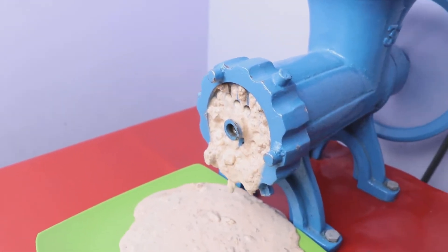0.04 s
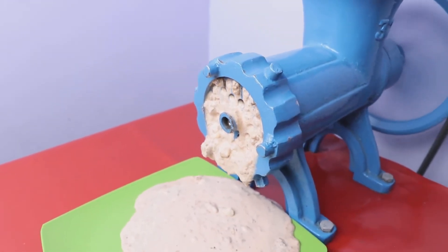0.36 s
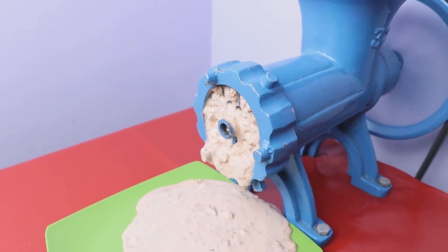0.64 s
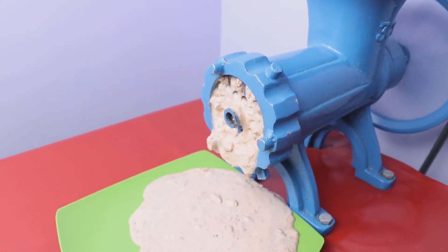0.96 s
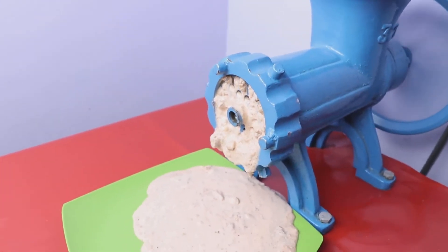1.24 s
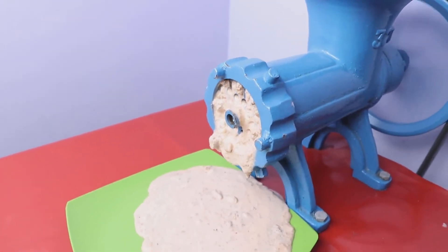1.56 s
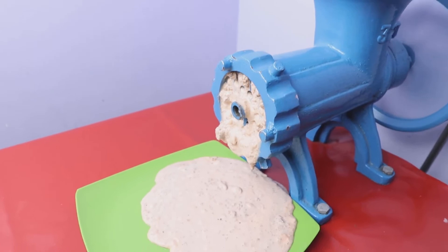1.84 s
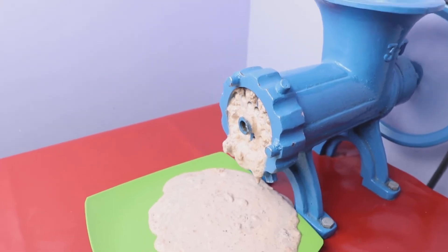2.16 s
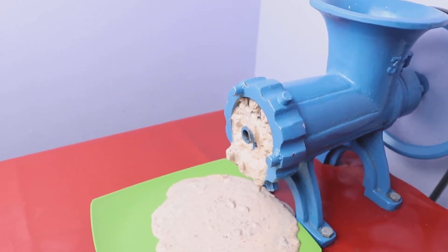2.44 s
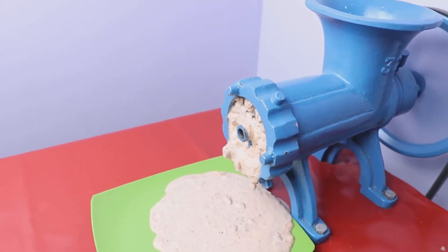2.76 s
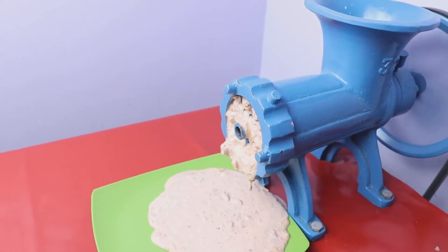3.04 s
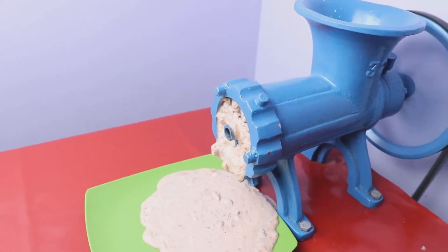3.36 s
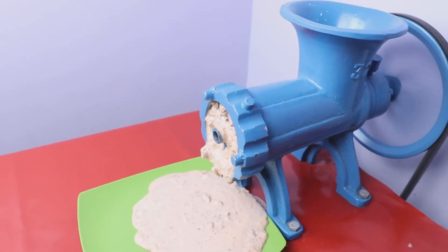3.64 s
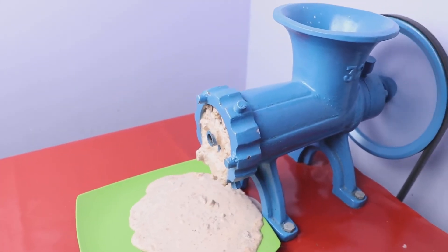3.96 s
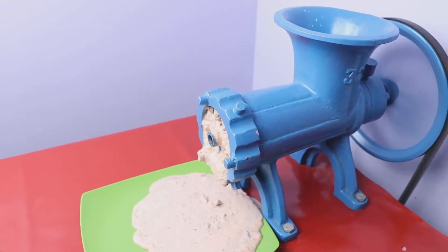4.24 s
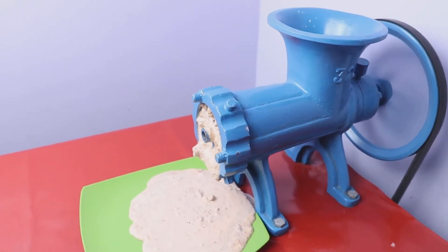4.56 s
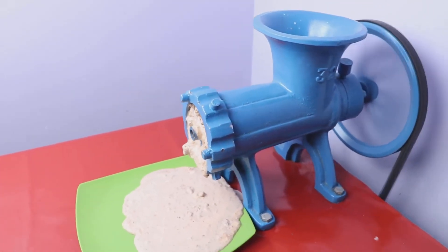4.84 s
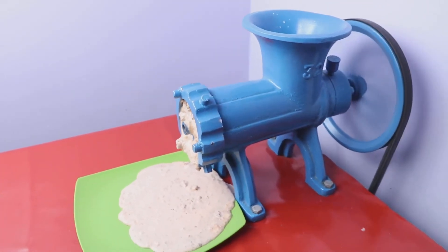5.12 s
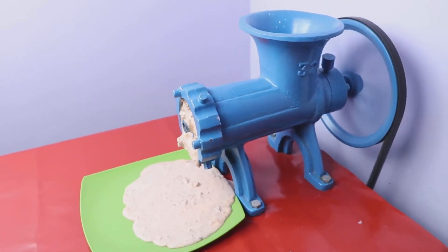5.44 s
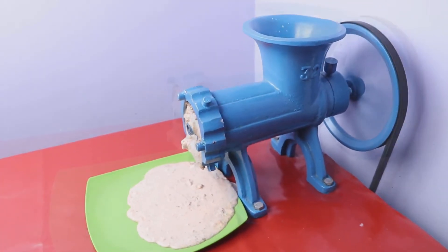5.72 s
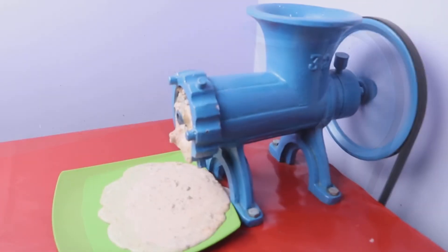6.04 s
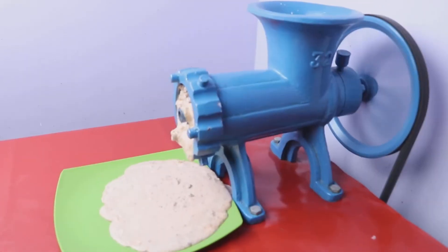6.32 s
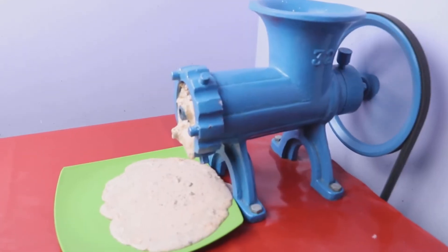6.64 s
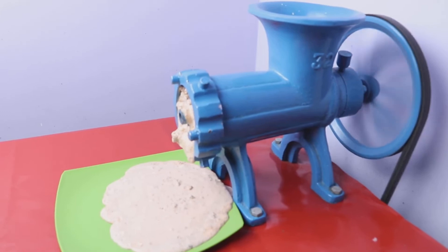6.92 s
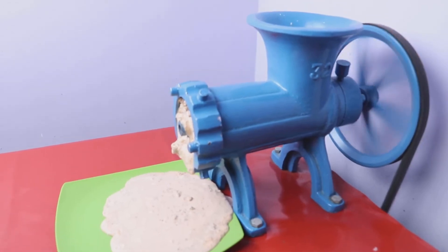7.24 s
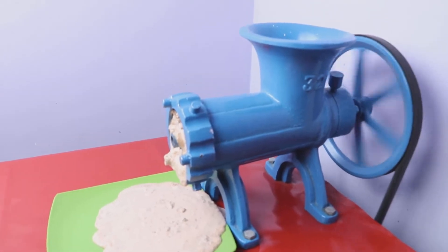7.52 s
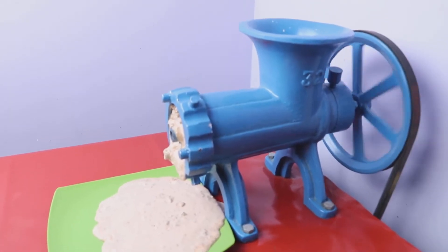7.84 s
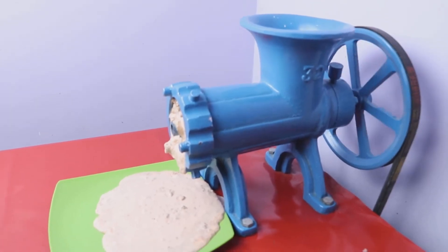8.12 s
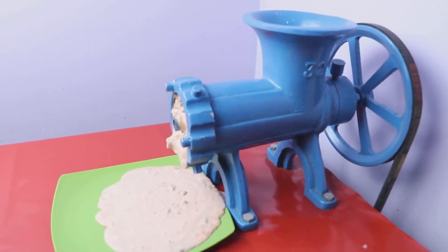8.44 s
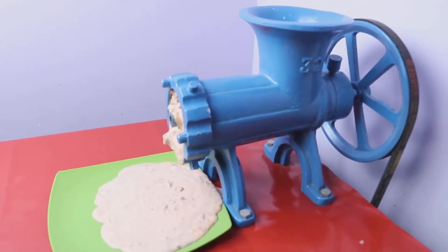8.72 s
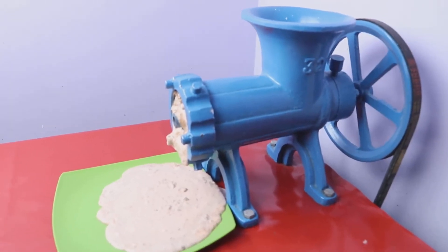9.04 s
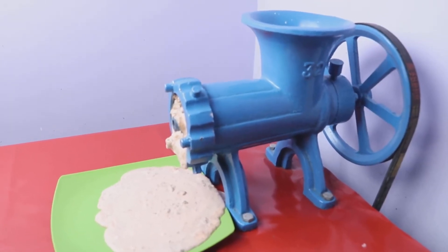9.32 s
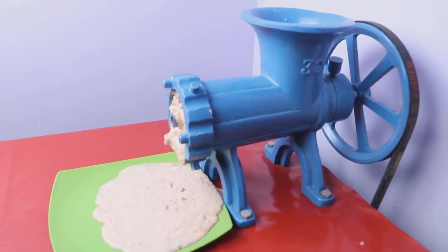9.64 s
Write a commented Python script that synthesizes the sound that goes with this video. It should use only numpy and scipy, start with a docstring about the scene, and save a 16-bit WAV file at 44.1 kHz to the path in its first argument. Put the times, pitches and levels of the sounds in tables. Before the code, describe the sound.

An iron grinder rattles and grinds squelching dough over a motor hum, then winds down with a few clanks into quiet.

```python
"""Cast-iron meat grinder pushing dough

A belt-driven grinder runs on a table: the motor hums, the boards rumble, the auger churns and rattles.
Each turn catches and grinds, every contact sounds through the iron body, the dough squelches and snaps.
The sound drops out for an instant and returns louder and hollower. The motor is switched off,
the wheel coasts to rest with separate clanks and ticks, and a small quiet room remains."""
import sys
import numpy as np
from scipy import signal
from scipy.fft import rfft, irfft, next_fast_len
from scipy.io import wavfile
from scipy.ndimage import uniform_filter1d, map_coordinates

SR = 44100
rng = np.random.default_rng(int(sys.argv[2]) if len(sys.argv) > 2 else 0)


def wav_record(signal):
    """Record a signal, one row per channel, as 16-bit PCM in the file named by sys.argv[1]."""
    frames = np.transpose(np.atleast_2d(signal))
    bounded = np.clip(frames, -1, 1)
    # unit amplitude maps onto the largest positive 16-bit level
    quanta = np.round(bounded * 32767).astype(np.int16)
    wavfile.write(sys.argv[1], SR, quanta)


N = 431298
TIME_S = np.arange(N) / SR
DROP_START, DROP_END, SWITCH_OFF, WHEEL_STOP = 5.889, 5.923, 6.785, 7.85  # t/s
MAINS_HZ, WHEEL_HZ, EDGES_PER_TURN = 50, 8.74, 5
CRUNCH_LENGTH_S, CRUNCH_SWELL_S = 0.009, 0.008

# room reverberation: f/Hz, t60/s
ROOM_DECAY = [(200, 0.56), (420, 0.42), (800, 0.32), (2000, 0.29), (3600, 0.25), (6000, 0.14),
              (14000, 0.38)]
# background spectrum: f/Hz, density/dB
AIR_COLOUR = [(15, -39), (25, -35.5), (64, -2.5), (107, -6.5), (126, -18), (199, -4), (254, -10.5),
              (448, -13.5), (527, -17.5), (603, -17), (856, -20), (1320, -23), (5070, -36), (12700, -34),
              (15800, -49)]
# stereo width of background and machine: f/Hz, side minus mid/dB
AIR_WIDTH = [(60, -10.5), (110, -6), (200, -14), (380, -4), (700, -3), (1290, -1), (2380, 1), (4400, -1),
             (8120, 2), (15000, -4)]
MACHINE_WIDTH = [(100, -19), (250, -22), (400, -14), (700, -6.5), (1400, -2.5), (2200, 0.5), (4000, 0),
                 (14000, 0)]
# machine balance: f/Hz, left minus right/dB
BALANCE = [(60, 3.5), (200, -1.5), (400, -0.5), (800, -1.5), (1300, -1.5), (2300, -5.5), (4400, -3),
           (8000, -4.5), (15000, -2)]

# table resonances: f/Hz, width/Hz, level/dB
TABLE_MODES = [(79.5, 21, -4), (97.6, 8.6, 5.5), (153.1, 5.8, 3.5), (170.4, 3.9, 1.5), (243.6, 20, -9.5)]
# table jolts: t/s, lift/dB, half width/s
JOLTS = [(2.5, 17, 0.044), (6.19, 9, 0.078)]
# 100 Hz motor hum: t/s, level/dB
HUM_LEVEL = [(0.0, -41.5), (0.3, -43.5), (0.85, -44.5), (1.2, -46), (1.65, -41.5), (2.3, -47.5),
             (2.7, -41.5), (3.2, -45), (3.6, -43.5), (4.45, -46), (4.76, -37.5), (5.0, -48), (5.13, -39),
             (5.4, -45.5), (5.65, -44.5), (5.85, -47.5), (6.0, -39), (6.25, -31), (6.34, -42.5),
             (6.74, -31.5), (6.78, -34)]
# hum partials: multiple of the mains, level/dB
HUM_PARTIALS = [(2, 0), (3, -16), (4, -38), (8, -9.5), (12, -23)]
# dips of the hum, half as deep in the table: t/s, gain/dB, half width/s
HUM_DIPS = [(2.5, -10, 0.041), (4.54, -20, 0.037), (5.46, -20, 0.034), (6.4, -11, 0.019)]

# spectra of hiss and click: f/Hz, density/dB
HISS_COLOUR = [(3000, -58.5), (7000, -11), (11500, -11), (13000, -2.5), (14200, -9), (15800, -12)]
CLICK_COLOUR = [(500, -36), (3000, 2.5), (7000, 7), (10500, -7), (13500, -13), (15600, 1)]
# top-end shelf of a click: f/Hz, share of the sparkle
SPARKLE_SHELF = [(9000, 0), (15300, 1)]
# bright clicks, wet snaps in the dough and later ticks of iron clanks: t/s, level/dB, sparkle/dB
CLICKS = [(0.167, -50, -10), (0.274, -47, -14), (0.289, -45, 6.5), (0.343, -51, -10.5), (0.402, -44.5, 7),
          (0.458, -51.5, -11), (0.503, -54, -8.5), (0.771, -46, -13), (0.889, -51, -12),
          (0.916, -45.5, -14), (1.06, -54.5, 6), (1.091, -45, 5), (1.257, -53, -11.5), (1.417, -52, -3.5),
          (1.761, -52, -6.5), (1.869, -53, 4), (2.147, -47.5, -12.5), (2.188, -56, 5), (2.517, -51, -10.5),
          (2.817, -48.5, -10), (2.86, -48.5, -13), (2.919, -51, 5), (3.089, -46, -6.5), (3.362, -53, 2),
          (3.608, -46, -13), (3.822, -57, -10), (3.89, -49, -11), (3.951, -47.5, 7), (4.005, -47.5, -2.5),
          (4.163, -48, -2.5), (4.205, -50, -10), (4.347, -52, -10), (4.522, -46.5, 6.5),
          (4.738, -55.5, -10.5), (4.85, -53.5, -6), (5.039, -43.5, -15), (5.122, -43.5, -16),
          (5.236, -50, -12), (5.304, -54, 4), (5.35, -51, -8), (5.44, -52.5, -9), (6.476, -51, -9.5),
          (6.745, -51, -6), (6.872, -51, -11), (7.018, -50.5, -15), (7.127, -57.5, -18), (7.55, -56.5, -23),
          (7.681, -57, -21.5)]
# pings in the plate's holes: t/s, f/Hz, level/dB
PINGS = [(1.092, 7740, -48), (2.922, 7550, -43), (3.09, 3600, -43), (6.746, 4600, -39.5),
         (6.873, 4640, -44)]
# air squeezed from the dough: t/s, f/Hz, level/dB, length/s
SQUELCHES = [(0.287, 2200, -29.5, 0.016), (0.401, 2330, -31, 0.014), (0.77, 4800, -39.5, 0.0095),
             (0.8, 3900, -44, 0.015), (0.908, 5250, -50.5, 0.014), (1.09, 2730, -31.5, 0.011),
             (1.094, 4500, -52, 0.02), (1.097, 7400, -49, .012), (1.388, 3680, -47, 0.0096),
             (1.421, 6550, -50.5, 0.011), (1.801, 5000, -44, 0.024), (1.871, 2790, -34.5, 0.028),
             (2.147, 5260, -47, 0.025), (2.16, 8460, -53, 0.025), (2.819, 8260, -49.5, 0.025),
             (2.831, 4200, -47.5, 0.029), (2.917, 1440, -28.5, 0.012), (2.923, 7300, -41.5, 0.018),
             (3.089, 3020, -43, 0.022), (3.286, 4560, -45.5, 0.019), (3.606, 7200, -46.5, 0.011),
             (3.744, 4550, -52, 0.014), (3.94, 7150, -50, 0.042), (4.097, 4200, -51, 0.02),
             (4.165, 2120, -33, .018), (4.167, 6560, -46.5, 0.014), (4.2, 4270, -44.5, .018),
             (4.51, 2270, -30.5, 0.015), (4.522, 7100, -47.5, 0.01), (4.885, 4770, -46.5, .016),
             (4.962, 2330, -30.5, 0.022), (4.99, 2250, -32.5, 0.019), (5.005, 4630, -42.5, 0.029),
             (5.013, 7200, -50, 0.027), (5.112, 4500, -43, 0.03), (5.295, 2150, -35, 0.02),
             (5.415, 2050, -35.5, 0.015), (6.745, 4220, -43.5, 0.011), (6.871, 4110, -47, 0.015),
             (7.201, 6600, -53.5, 0.027)]

# iron body resonances: f/Hz, width/Hz, lift/dB
IRON_MODES = [(404.4, 56, 4.5), (520.5, 31, 4.5), (600, 20, 4.5), (754, 71, 5), (882, 38, 4), (1288, 15, 6),
              (1501, 39, 7), (1638, 92, 9), (1765, 86, 1.5), (1790, 110, 2.5), (1920, 31, 7), (2155, 13, 3),
              (2654, 53, 4.5), (2905, 69, -6.5), (3640, 79, 2), (4450, 310, 5), (5760, 440, 9.5),
              (6680, 470, 4), (7600, 81, 1.5)]
# lightly damped iron modes: f/Hz, level/dB, t60/s
RING_MODES = [(174.1, -9, 1.1), (409, -10, 1.05), (526, -16.5, .9), (720, -19, .7), (921, -10, 0.31),
              (1264, -15.5, .55), (1460, -19, .35)]
# body colour when packed with dough, hollow and coasting: f/Hz, density/dB
PACKED_COLOUR = [(130, -55), (220, -6.5), (332, -7), (395, 1.5), (466, -6), (728, -9), (1060, -13),
                 (1180, -3), (1810, -10.5), (1980, -5), (3150, -20.5), (5020, -35.5), (7570, -35),
                 (10300, -41.5), (15800, -63)]
HOLLOW_COLOUR = [(220, -30), (310, -15.5), (410, -0.5), (500, -8), (609, -8), (680, -13.5), (820, -2.5),
                 (1060, -19.5), (1200, -2.5), (1600, -7), (2050, -7.5), (2500, -18.5), (3000, -28.5),
                 (3650, -32), (5000, -45.5), (8000, -43.5), (15800, -66)]
COASTING_COLOUR = [(220, -32), (310, -16), (410, 0.5), (500, -9.5), (609, -7), (680, -12.5), (840, -5.5),
                   (960, -8), (1060, -13), (1200, -5.5), (1600, -10), (2050, -6), (2450, -11), (3000, -22),
                   (3650, -21.5), (5000, -37.5), (7000, -36.5), (9000, -43.5), (15800, -69.5)]
# the listening point wanders; bounds of the stretches with their own echo paths: t/s
STRETCH_BOUNDS_S = [0, 1.0, 2.0, 3.05, 4.0, 4.8, DROP_START, 6.7, 7.5, 8.2]
# contact bands, rows thud, clunk, clank, tick: low/Hz, high/Hz
BANDS_HZ = [(290, 680), (680, 1050), (1050, 3000), (3000, 20000)]
# machine effort: t/s, level/dB
EFFORT = [(0, 0.5), (5.88, -1), (5.93, 6.5), (6.02, 5.5), (6.5, 6.5), (6.62, 4.5), (6.87, 2.5), (7.1, -3.5),
          (7.36, -1.5), (7.5, -11), (7.8, -11)]
# slack feed, auger almost free: t/s, gain/dB, half width/s
LULLS = [(0.11, -7.5, 0.024), (0.16, -3, .012), (0.205, -0.5, 0.017), (0.55, -3.5, 0.013),
         (0.665, -5, 0.026), (0.99, -5, 0.022), (1.28, -3, 0.042), (1.51, -6, 0.034), (1.585, -3.5, 0.015),
         (1.712, -5, 0.022), (1.83, -5, 0.018), (2.282, -4, 0.026), (2.5, -2, .018), (2.76, -4.5, 0.025),
         (2.905, -1, .018), (3.03, -2.5, 0.046), (3.195, -1.5, 0.017), (3.53, -5, 0.013),
         (4.32, -2.5, 0.0181), (4.44, -3, 0.031), (4.705, -2.5, .02), (4.785, -3.5, 0.014),
         (5.22, -2.5, 0.028), (5.63, 0.5, 0.017), (6.085, -2, .018), (6.32, -1, .022), (6.56, -4.5, 0.016),
         (6.72, -3.5, 0.015), (7.115, -6, .015)]
# treble swing from uneven feed: t/s, level/dB
TREBLE_SWING = [(0.0, -45.5), (0.46, -47), (0.57, -45.5), (1.0, -51), (1.1, -49), (1.54, -51),
                (1.65, -49.5), (1.8, -51), (2.39, -48), (2.7, -39), (3.06, -53.5), (3.81, -49),
                (4.11, -47.5), (4.65, -47), (4.88, -45.5), (5.04, -46.5), (5.65, -42), (5.88, -43.5)]
# share of that swing: thud, clunk, clank, tick
TREBLE_SHARE = [0.05, .1, .4, .55]
# auger at zero drive, rows packed and hollow: thud/dB, clunk/dB, clank/dB, tick/dB
CHURN_DB = [(-42, -45, -45.5, -55.5), (-40, -47.5, -50.5, -61.5)]
CATCH_DB = [(-40.5, -40, -37.5, -53.5), (-35, -33, -42.5, -64.5)]
GRIND_DB = [(-41, -39.5, -37, -59), (-33.5, -31, -32, -65)]
# first grind past the tight spot, packed and hollow: t/s
FIRST_GRIND_S = [0.053, 6.035]
# stiff lumps crunching in the barrel: t/s, level/dB
LUMPS = [(0.287, -36), (0.41, -38), (0.713, -36), (0.742, -39.5), (0.82, -32), (0.878, -30.5), (1.062, -32),
         (1.094, -33), (1.43, -32.5), (1.644, -32), (1.761, -26), (1.884, -27.5), (2.19, -32.5),
         (2.462, -38.5), (2.673, -33), (3.364, -32), (3.605, -30), (3.832, -32), (3.9, -33.5), (3.958, -33),
         (4.165, -29.5), (4.29, -43.5), (4.531, -34.5), (4.665, -41), (4.855, -30.5), (4.985, -34),
         (5.301, -36), (5.425, -32.5), (5.447, -43.5), (5.768, -47), (6.039, -33.5), (6.158, -32),
         (6.272, -32), (6.497, -26)]
# iron on iron: t/s, level/dB, brightness/dB, extra thud/dB, chatter/s
STRIKES = [(0.132, -33.5, -4, -1, 0.0052), (0.168, -32.5, -2.5, -4, 0.0059), (0.23, -34.5, 4, 3, 0.009),
           (0.77, -37, 9.5, -4, 0.012), (0.915, -35, 8.5, -12, 0.0089), (1.03, -35, 0.5, 3, .012),
           (1.316, -31, 0, 0, .0074), (1.601, -40, -4, 6, .012), (1.737, -37, 0, 2, 0.0065),
           (1.847, -36.5, 4, 5, 0.0054), (2.309, -33, 1, 0, 0.0058), (2.42, -36.5, 3, 4, 0.027),
           (2.519, -37.5, 1, 14, 0.0066), (2.92, -33.5, -3, -3, 0.0065), (3.088, -32.5, 5.5, 1, 0.0081),
           (3.239, -38, 1.5, 4, 0.037), (4.003, -37, 3.5, 2, 0.026), (4.35, -31.5, 6, 0, 0.0084),
           (4.462, -33.5, 0, 6, .012), (5.099, -36, 5, 0, 0.02), (5.378, -34.5, 8, 0, .0065),
           (5.72, -35, 4.5, -2, 0.019), (6.022, -33, -18.5, 3, 0.0096), (6.107, -36.5, -7, -3, 0.01),
           (6.137, -31.5, -14.5, 5, .012), (6.22, -55, -22.5, 4, 0.013), (6.43, -32.5, -1, 0, .012),
           (6.475, -30.5, -3, -6, .008), (6.68, -38.5, -0.5, 7, 0.013), (6.745, -43, 17, 0, 0.0043),
           (6.795, -43, -13, 11, .0056), (6.838, -38.5, -9, 6.5, 0.0079), (6.872, -35, 5.5, -1, .009),
           (6.918, -34.5, -8.5, 4.5, .026), (6.966, -32.5, -3, 6, 0.0085), (7.02, -36.5, 2.5, 13, 0.0089),
           (7.085, -47, -14, 9.5, 0.013), (7.127, -32, -2, 2.5, .006), (7.189, -44.5, 6.5, 5.5, .015),
           (7.256, -45, -7.5, 3.5, .012), (7.29, -32.5, -7, -3, .0094), (7.329, -31, -4.5, 2.5, 0.0096),
           (7.404, -40.5, -2, 5, .014), (7.55, -35.5, -12, -4.5, 0.014), (7.611, -44.5, -14.5, -1, .025),
           (7.683, -26, -7, -4.5, .0105), (7.753, -35, -5, 0.5, 0.008), (7.761, -35, -20.5, -7.5, 0.0072),
           (7.793, -43, -24, -1, 0.0075), (7.815, -35.5, -18.5, -3.5, 0.0071)]
# lump or strike, one row a band: offset/dB, dB per dB of brightness
BLOW_COLOUR = [(-6.5, -0.97), (-10.5, -1), (0, 0), (-15.5, 1.2845)]


def amp(db):
    """Decibels to gain."""
    return 10 ** (np.asarray(db) / 20)


def unit(x):
    """Scale to rms 1."""
    return x / np.sqrt(np.mean(x ** 2) + 1e-20)


def along(points, hz):
    """Interpolate (f/Hz, value) points on a log axis."""
    knots_hz, values = np.transpose(points)
    return np.interp(np.log(hz + 1), np.log(knots_hz + 1), values)


def curve(points):
    """Interpolate (t/s, value) points per sample."""
    return np.interp(TIME_S, *np.transpose(points))


def bumps_db(rows):
    """Gaussian dips or swells from (t/s, gain/dB, half width/s) rows."""
    coarse_s = TIME_S[::64]
    gain_db = sum(db * np.exp(-((coarse_s - s) / width_s) ** 2) for s, db, width_s in rows)
    return np.interp(TIME_S, coarse_s, gain_db)


def wobble(rate_hz):
    """Smooth random curve."""
    coarse_s = TIME_S[::64]
    knots = rng.standard_normal(int(N * rate_hz / SR) + 4)
    return np.interp(TIME_S, coarse_s, map_coordinates(knots, [coarse_s * rate_hz]))


def filtered(x, response):
    """Apply a frequency response."""
    n = x.shape[-1]
    padded = next_fast_len(n + SR // 4)
    return irfft(rfft(x, padded) * response(np.fft.rfftfreq(padded, 1 / SR)), padded)[..., :n]


def causal(gain):
    """Minimum-phase response: rings only after a blow."""
    cepstrum = irfft(np.log(np.maximum(gain, 1e-6)))
    half = len(cepstrum) // 2
    cepstrum[1:half] *= 2
    cepstrum[half + 1:] = 0
    return np.exp(rfft(cepstrum))


def stereo_noise(colour, width):
    """Coloured noise, mid at rms 1."""
    mid = filtered(rng.standard_normal(N), colour)
    side = filtered(rng.standard_normal(N), lambda hz: colour(hz) * amp(along(width, hz)))
    return np.array([mid + side, mid - side]) / np.std(mid)


def room_paths(near_t60_s, direct_db, room_db, size=16384):
    """Mid and side spectra of direct wave, dense near echoes and room tail."""
    t, hz = np.arange(size) / SR, np.fft.rfftfreq(size, 1 / SR)
    near = unit(rng.standard_normal((2, size)) * amp(-60 * t / near_t60_s))
    near[0, 0] += amp(direct_db) * np.sqrt(size)
    bins_hz, frames_s, noise = signal.stft(rng.standard_normal((2, size)), SR, nperseg=256)
    decay = amp(-60 * frames_s / along(ROOM_DECAY, bins_hz)[:, None])
    tail = signal.istft(noise * decay, SR, nperseg=256)[1][:, :size]
    spectrum = rfft(np.array([unit(channel) for channel in near]) + amp(room_db) * unit(tail))
    spectrum[1] *= amp(along(MACHINE_WIDTH, hz))
    return hz, spectrum


def left_right(spectrum):
    """Mid and side spectra to a stereo impulse response, mid energy 1."""
    mid, side = irfft(spectrum)
    return np.array([mid + side, mid - side]) / np.linalg.norm(mid)


def run_out_db(fall_db_per_s):
    """Level fall after the wheel stops."""
    return -fall_db_per_s * np.maximum(TIME_S - WHEEL_STOP, 0)


def auger_drive_db(slack_db=-0.5, slack_s=0.018):
    """Auger pressure per band and sample: effort, lift-off before strikes, lulls, treble swing."""
    strikes_s = np.sort([row[0] for row in STRIKES] + [np.inf])
    wait_s = strikes_s[np.searchsorted(strikes_s, TIME_S)] - TIME_S
    lift_off_db = slack_db * np.exp(-(wait_s / slack_s) ** 2)
    treble_db, packed = curve(TREBLE_SWING), TIME_S < DROP_START
    swing_db = np.outer(TREBLE_SHARE, (treble_db - treble_db[packed].mean()) * packed)
    return curve(EFFORT) + lift_off_db + bumps_db(LULLS) + swing_db


def background(running_db=-56, still_db=-66):
    """Faint rumble and hiss, lower by switch-off; faded down briefly around 7.9 s."""
    level_db = np.interp(TIME_S, [DROP_START, SWITCH_OFF], [running_db, still_db])
    fade_db = -6.5 * np.exp(-((TIME_S - 7.89) / 0.34) ** 2)
    return amp(level_db + fade_db) * stereo_noise(lambda hz: amp(along(AIR_COLOUR, hz)), AIR_WIDTH)


def table_rumble(base_db=-50.5, effort_share=0.62, ease_db_per_s=1.0):
    """The machine shakes the table's low resonances."""
    def boards(hz):
        modes = sum((-1) ** k * amp(db) * 1j * hz * width_hz / (mode_hz**2 - hz**2 + 1j * hz * width_hz)
                    for k, (mode_hz, width_hz, db) in enumerate(TABLE_MODES))
        return modes / (1 + (hz / 330) ** 4) / (1 + (55 / (hz + 1)) ** 4)

    ease_db = ease_db_per_s * (DROP_START / 2 - TIME_S) * (TIME_S < DROP_START)
    level_db = base_db + effort_share * curve(EFFORT) + ease_db + run_out_db(fall_db_per_s=85)
    level_db += bumps_db(JOLTS) + .5 * bumps_db(HUM_DIPS)
    return amp(level_db) * stereo_noise(boards, MACHINE_WIDTH)


def motor(cut_db_per_s=2100):
    """Magnetic hum on mains multiples; dies at once at switch-off."""
    hum = np.zeros(N)
    for multiple, db in HUM_PARTIALS:
        peak = np.sqrt(2) * amp(db + 0.55 * wobble(24))
        phase = 0.17 * wobble(8.2) + rng.uniform(0, 2 * np.pi)
        hum += peak * np.sin(2 * np.pi * multiple * MAINS_HZ * TIME_S + phase)
    cut_db = cut_db_per_s * np.maximum(TIME_S - SWITCH_OFF, 0)
    return hum * amp(curve(HUM_LEVEL) + bumps_db(HUM_DIPS) - cut_db)


def hiss(sizzle_db=-69, hiss_db=-58.5, hold_s=0.28, fade_db_per_s=28,
         spit_s=7.205, spit_db=-51, spit_rise_s=0.0042, spit_t60_s=0.18):
    """Packed dough sizzles; a thin hiss holds and fades after the drop-out; one air pocket spits."""
    age_s = TIME_S - spit_s
    rise = np.exp(np.minimum(age_s, 0) / spit_rise_s)
    spit = rise * amp(spit_db - 60 * np.maximum(age_s, 0) / spit_t60_s)
    fade_db = fade_db_per_s * np.maximum(TIME_S - DROP_END - hold_s, 0)
    level_db = np.where(TIME_S < DROP_END, sizzle_db + bumps_db(LULLS), hiss_db - fade_db)
    envelope = amp(level_db) * (TIME_S < SWITCH_OFF) + spit
    return envelope * stereo_noise(lambda hz: amp(along(HISS_COLOUR, hz)), MACHINE_WIDTH)


def bright_click(sparkle_db):
    """One bright click with near echoes."""
    hz, paths = room_paths(near_t60_s=0.028, direct_db=-6, room_db=-10, size=4096)
    click = left_right(paths * causal(amp(along(CLICK_COLOUR, hz))))
    shelf = causal(amp(sparkle_db * along(SPARKLE_SHELF, hz)))
    return np.sqrt(0.004 * SR) * irfft(rfft(click) * shelf)


def crackle(base_db=-62, scatter_db=4.5, count=150):
    """Faint wet ticks in the packed barrel, stronger as the auger presses."""
    out, press_db = np.zeros((2, N)), auger_drive_db()[-1]
    starts = rng.integers(int(DROP_START * SR), size=count)
    for start, size, shine in zip(starts, *rng.standard_normal((2, count))):
        click = bright_click(sparkle_db=-7 + 5 * shine)
        out[:, start:][:, :click.shape[1]] += amp(base_db + press_db[start] + scatter_db * size) * click
    return out


def pings(t60_s=0.14, detune_hz=45):
    """Bursts ring the plate's holes: a close tone pair with its own phases on each side."""
    out, t = np.zeros((2, N)), TIME_S[:SR // 4]
    for s, hz, db in PINGS:
        pair = sum(np.sin(2 * np.pi * ((hz + k * detune_hz) * t + rng.random((2, 1)))) for k in (-1, 1))
        out[:, int(s * SR):][:, :len(t)] += amp(db - 60 * t / t60_s) * pair
    return out


def clicks():
    """Bright clicks: wet snaps in the dough, later the sharp ticks of iron clanks."""
    out = np.zeros((2, N))
    for s, db, sparkle_db in CLICKS:
        click = bright_click(sparkle_db)
        out[:, int(s * SR):][:, :click.shape[1]] += amp(db) * click
    return out


def squelches(spray_hz=6930, spray_db=-21, ring_s=0.0012, scatter_db=4.5, count=56):
    """Clusters of tiny bursting bubbles around one pitch, each with a fine spray."""
    out, t = np.zeros((2, N + SR)), TIME_S[:512]
    for s, pitch_hz, db, length_s in SQUELCHES:
        burst = np.zeros(SR // 6)
        clusters = [(pitch_hz, 0, min(0.096 * pitch_hz, 520)), (spray_hz, spray_db, 700)]
        for centre_hz, share_db, spread_hz in clusters:
            for when, detune, size in np.clip(rng.standard_normal((count, 3)), -2, 2):
                bubble = np.exp(-t / ring_s) * np.sin(2 * np.pi * (centre_hz + spread_hz * detune) * t)
                start = int(abs(length_s * when) * SR)
                burst[start:][:len(t)] += amp(share_db + scatter_db * size) * bubble
        hz, paths = room_paths(near_t60_s=0.028, direct_db=-1.5, room_db=-3, size=8192)
        highpass = 1j * hz / (1j * hz + 900)  # tiny bubbles radiate no bass
        sound = signal.fftconvolve(burst[None], left_right(paths * highpass), axes=1)
        sound *= amp(db) * np.sqrt(length_s * SR) / np.linalg.norm(sound.mean(axis=0))
        out[:, int(s * SR):][:, :sound.shape[1]] += sound
    return out[:, :N]


def churn_contacts(drive_db, rate_hz=1300, scatter_db=3, turn_db=-1, edge_db=3, uneven_db=0.74, spots=3):
    """Dense auger and knife contacts, pulsing with turns and edges: force[band, spot, sample]."""
    touches = (rng.random((spots, N)) < rate_hz / spots / SR) * rng.choice([-1, 1], (spots, N))
    angle = 2 * np.pi * WHEEL_HZ * TIME_S
    press_db = turn_db * np.cos(angle) + edge_db * np.cos(EDGES_PER_TURN * angle) + uneven_db * wobble(45)
    touches = unit(touches * amp(press_db + scatter_db * rng.standard_normal((spots, N))))
    packed, hollow = amp(CHURN_DB)[:, :, None, None]
    gain = amp(drive_db + run_out_db(fall_db_per_s=393))[:, None] / np.sqrt(spots)
    return np.where(TIME_S < DROP_START, packed, hollow) * gain * touches


def blow_db(level_db, brightness_db):
    """Band levels of one blow."""
    offset_db, tilt = np.transpose(BLOW_COLOUR)
    return level_db + offset_db + tilt * brightness_db


def knock_events(drive_db, catch_lead_s=0.043, catch_swell_s=0.004, scatter_db=1.0):
    """Strikes, lumps, and each driven turn's catch and grind: t/s, band levels/dB, chatter/s, swell/s."""
    knocks = [(s, blow_db(db, bright_db) + [thud_db, 0, 0, 0], chatter_s, 0)
              for s, db, bright_db, thud_db, chatter_s in STRIKES]
    knocks += [(s, blow_db(db, 0), CRUNCH_LENGTH_S, CRUNCH_SWELL_S) for s, db in LUMPS]
    runs = zip(FIRST_GRIND_S, [DROP_START, SWITCH_OFF], GRIND_DB, CATCH_DB)
    for first_s, end_s, grind_db, catch_db in runs:
        for turn_s in np.arange(first_s, end_s, 1 / WHEEL_HZ):
            catch = (turn_s - catch_lead_s, catch_db, catch_swell_s)
            grind = (turn_s, grind_db, CRUNCH_SWELL_S)
            for s, band_db, swell_s in (catch, grind):
                push_db = drive_db[:, max(int(s * SR), 0)] + scatter_db * rng.standard_normal()
                knocks.append((s, band_db + push_db, CRUNCH_LENGTH_S, swell_s))
    return knocks


def knock_contacts(drive_db, first_db=7, scatter_db=2.5, count=28, spots=3):
    """Each knock is a first blow and exponentially thinning chatter: force[band, spot, sample]."""
    force = np.zeros((len(BANDS_HZ), spots, N))
    for s, band_db, chatter_s, swell_s in knock_events(drive_db):
        delay_s = -chatter_s * np.log(1 - (np.arange(count) + rng.random(count)) / count)
        delay_s[0] = 0
        strength = amp(scatter_db * rng.standard_normal(count)) * rng.choice([-1, 1], count)
        if swell_s == 0:  # bare iron hits hard; a long scrape starts softer
            strength[0] = amp(first_db) * np.sqrt(CRUNCH_LENGTH_S / chatter_s)
        delay_s += swell_s * rng.standard_normal(count)  # dough spreads the contacts into a crunch
        strength *= np.sqrt(chatter_s * SR) / np.linalg.norm(strength)
        spot = rng.integers(spots, size=count)
        samples = np.clip(((s + delay_s) * SR).astype(int), 0, N - 1)
        force[:, spot, samples] += amp(band_db)[:, None] * strength
    return force


def iron_response(colour, low_hz, high_hz):
    """Stereo impulse response of one spot on the iron body, in one band."""
    hz, paths = room_paths(near_t60_s=0.057, direct_db=1, room_db=-7)
    lift_db = sum(db / (1 + (2 * (hz - mode_hz) / width_hz) ** 2) for mode_hz, width_hz, db in IRON_MODES)
    band = (1 + (low_hz / (hz + 1)) ** 16) ** -.5 * (1 + (hz / high_hz) ** 16) ** -.5
    return left_right(paths * causal(amp(along(colour, hz) + lift_db) * band))


def dough_damping(x, depth_db=2.07, full_depth_hz=2500):
    """Shifting dough damps the body unevenly over time and frequency."""
    spectra = signal.stft(x, nperseg=512)[2]
    patch = np.outer(np.hanning(11), np.hanning(13))
    field = unit(signal.oaconvolve(rng.standard_normal(spectra.shape[1:]), patch, "same"))
    treble = np.minimum(np.fft.rfftfreq(512, 1 / SR) / full_depth_hz, 1)[:, None]
    return signal.istft(spectra * amp(depth_db * treble * field), nperseg=512)[1][:, :N]


def grinder(ring_db=-44.5):
    """Contacts sound through the iron body: packed, hollow, then coasting. Thuds leave a long ring."""
    drive_db = auger_drive_db()
    force = knock_contacts(drive_db) + churn_contacts(drive_db)
    body = np.zeros((2, N + SR))
    for start_s, end_s in zip(STRETCH_BOUNDS_S, STRETCH_BOUNDS_S[1:]):
        late_colour = HOLLOW_COLOUR if end_s < SWITCH_OFF else COASTING_COLOUR
        colour = PACKED_COLOUR if start_s < DROP_START else late_colour
        start, end = int(start_s * SR), int(end_s * SR)
        for edges_hz, spots in zip(BANDS_HZ, force):
            for blows in spots:
                response = iron_response(colour, *edges_hz)
                sound = signal.oaconvolve(blows[None, start:end], response, axes=1)
                body[:, start:start + sound.shape[1]] += sound
    t, thuds = TIME_S[:SR], force[0].sum(axis=0)
    ring = sum(amp(db - 60 * t / t60_s) * np.sin(2 * np.pi * hz * t) for hz, db, t60_s in RING_MODES)
    return dough_damping(body[:, :N]) + amp(ring_db) * signal.oaconvolve(thuds, ring)[:N]


def scene():
    """Machine slightly to the right, over the background."""
    machine = grinder() + squelches() + clicks() + pings() + crackle() + motor() + table_rumble() + hiss()
    placed = filtered(machine, lambda hz: amp(np.outer([.5, -.5], along(BALANCE, hz))))
    return placed + background() * amp([[-.8], [.8]])


def record(dry, floor_db=-48, top_hz=15850):
    """Brief drop-out, then a band limit."""
    gate = uniform_filter1d(1. * ((TIME_S < DROP_START) | (TIME_S > DROP_END)), size=64)
    return filtered(dry * np.maximum(gate, amp(floor_db)), lambda hz: hz < top_hz)


dry = scene()
out = record(dry)
wav_record(out)
```